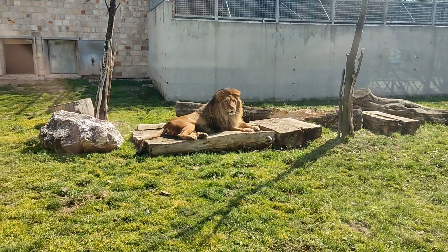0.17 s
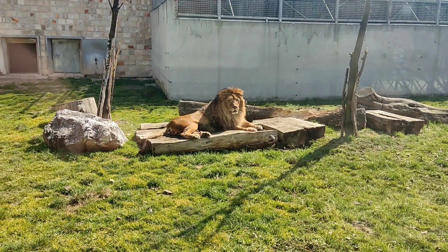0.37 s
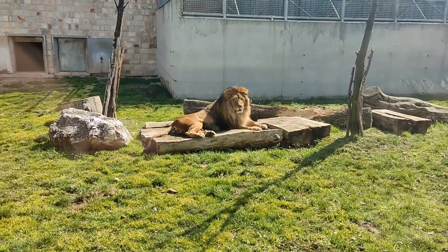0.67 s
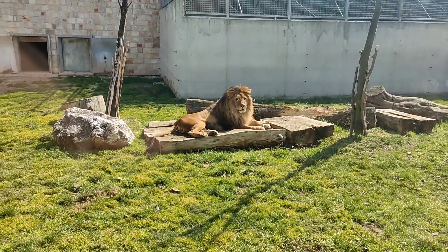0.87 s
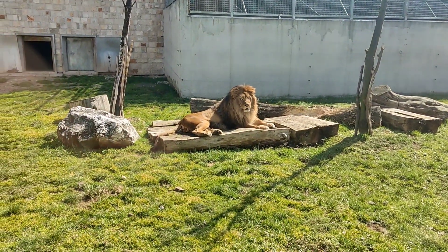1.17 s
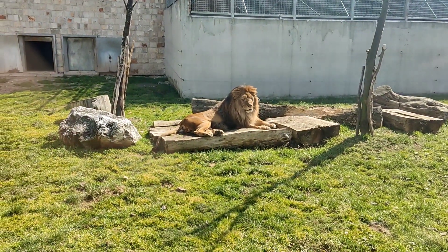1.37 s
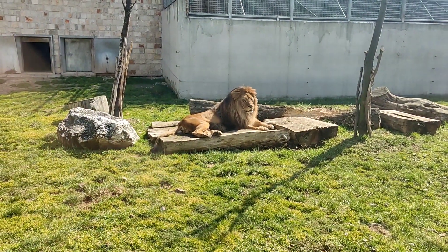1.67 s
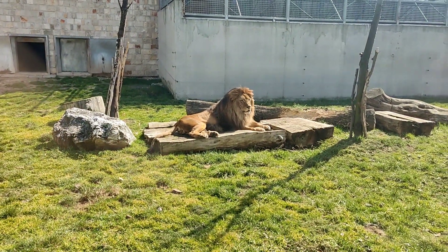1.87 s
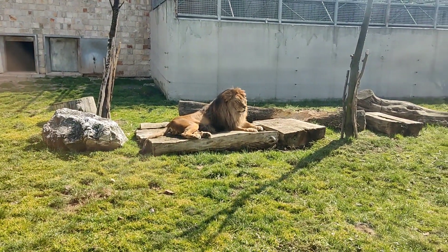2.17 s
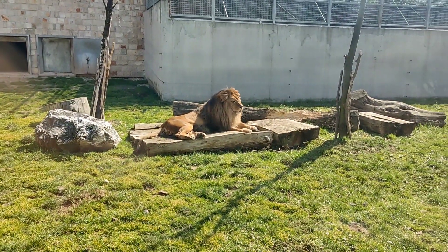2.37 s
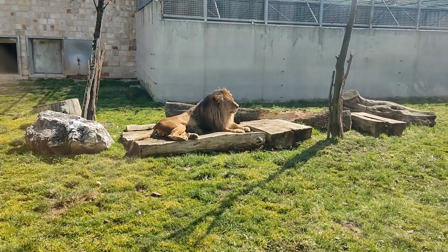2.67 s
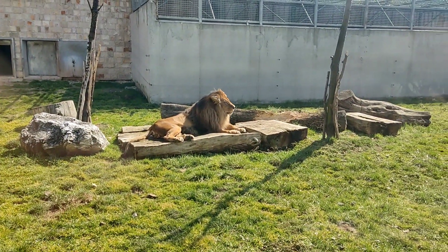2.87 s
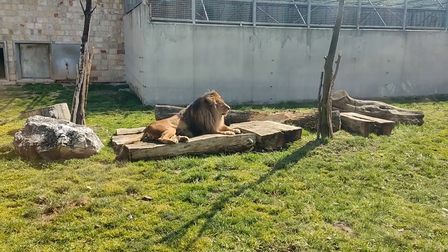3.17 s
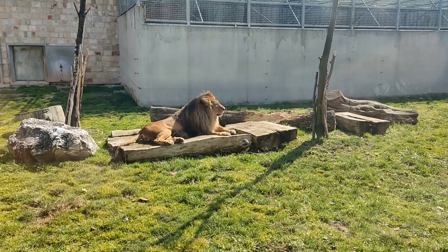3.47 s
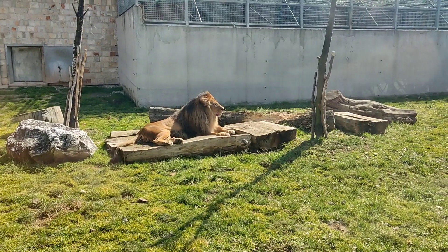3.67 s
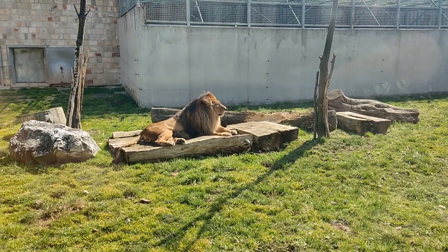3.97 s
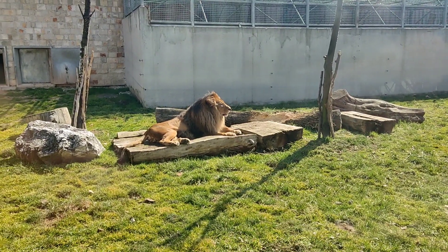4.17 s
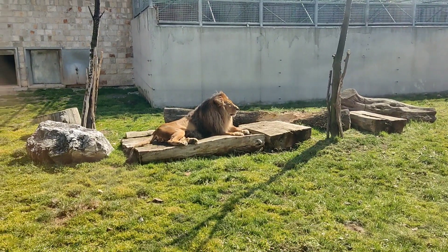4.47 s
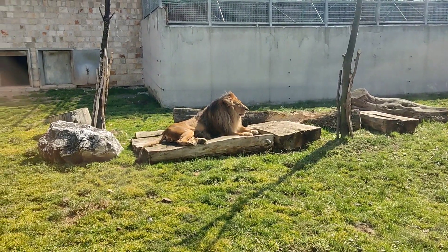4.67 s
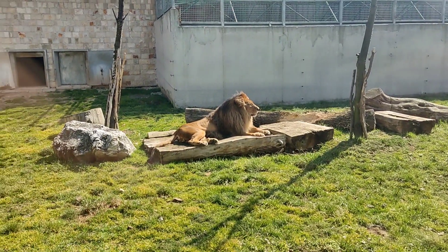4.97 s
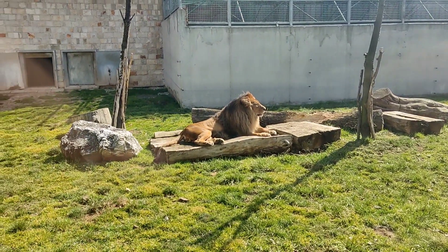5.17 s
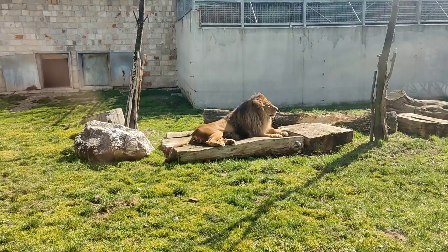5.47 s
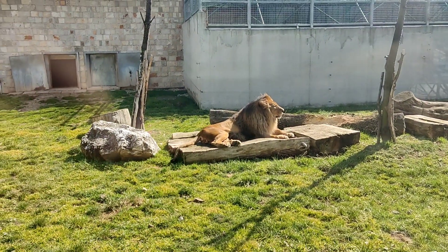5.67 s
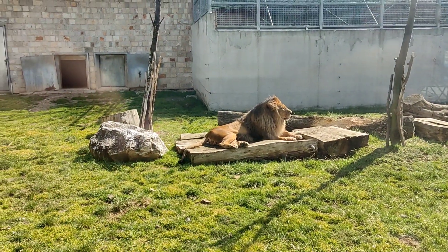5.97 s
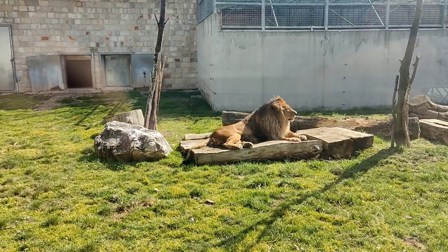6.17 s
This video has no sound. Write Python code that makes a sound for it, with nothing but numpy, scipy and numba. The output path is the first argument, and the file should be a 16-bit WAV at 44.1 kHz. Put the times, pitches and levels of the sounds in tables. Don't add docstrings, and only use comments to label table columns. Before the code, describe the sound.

A lion close on the left saws out a steady run of rasping in-breaths and rough, throaty grunts over faint outdoor wind and hiss.

```python
import sys
import numpy as np
from scipy import signal
from scipy.fft import rfft, irfft
from scipy.io import wavfile
from scipy.ndimage import uniform_filter1d, minimum_filter1d
from numba import njit

SR = 44100
rng = np.random.default_rng(int(sys.argv[2]) if len(sys.argv) > 2 else 0)


def decibels_to_gain(level_db):
    exponent = np.asarray(level_db, float) / 20
    return 10 ** exponent


def transcribe(signal):
    frames = np.atleast_2d(signal).T
    limited = np.clip(frames, -1, 1)
    pcm = np.round(limited * 32767).astype(np.int16)
    wavfile.write(sys.argv[1], SR, pcm)


N = 279153

# pitch_hz, level_db (per Hz)
WIND_COLOUR = [(15, -19), (25, 9.5), (129, 0), (392, -2.5), (1050, -42), (1440, -29), (1870, -23),
               (2710, -36), (4140, -16), (6160, -44), (6850, -20), (8030, -28), (14000, -51)]
# pitch_hz, left_minus_right_db
SHADE = [(60, -1), (160, 10), (400, 13), (800, 22), (1400, 25.5), (2300, 21.5), (2750, 10), (3050, 16),
         (3400, 33), (4200, 30), (4700, 32), (5600, 33), (8000, 24), (14000, 7)]
# pitch_hz, lead_radians
LEAD = [(0, 0), (780, 2.6), (2410, 5.3), (3100, 8.8), (4740, 11.0), (5080, 11.8), (5680, 17.9),
        (6890, 25.5), (7320, 25.3), (7920, 29.1), (10300, 22.4), (11500, 26.3), (13400, 41.1),
        (13900, 41.0)]
# pitch_hz, level_db (against the left)
SCATTER = [(100, -20), (1000, -26), (2300, -22), (2800, -12), (3400, -21), (4300, -21), (5000, -7),
           (6000, -5), (8400, -11), (14000, -3)]
# start_s, first_hz, last_hz, length_s, level_db
CHIRPS = [
    (0.062, 5600, 4000, 0.046, -41),
    (5.21, 620, 545, 0.075, -41.5),
    (5.215, 1000, 710, 0.088, -38),
    (.5, 1700, 3400, 0.023, -38),
]

# pitch_hz, width_hz, level_db
CHEST = [(309, 210, -10.5), (401, 55, 4), (460, 44, -6.5)]
THROAT = [(654, 105, -7.5), (700, 85, -4), (754.3, 72.4, -2.5), (941.3, 61.6, 0.5), (1002, 82, -5),
          (1140, 52, 1.5), (1210, 151, -4), (1360, 64, -2.5)]
MOUTH = [(1510, 352, -6.5), (1830, 126, 1.5), (2230, 164, -1), (2630, 370, -10), (2770, 385, -15.5),
         (3227, 276, -9), (3795, 520, -16), (4258, 312, -9.5), (4842, 140, -15), (5000, 110, -30.5),
         (5710, 140, -22)]
TEETH = [(8040, 4500, -1.1), (10470, 1700, -0.9)]
OPEN_AIR = [(3510, 670, 0)]

# start_s, end_s, first_db, last_db, mouth_opening_db
PULLS = [
    (0.447, 0.507, -10.5, -18, -2.5),
    (1.166, 1.303, -19, -16, -2.5),
    (1.986, 2.054, -17.5, -23, -7),
    (2.77, 2.837, -19.5, -17, -2.5),
    (3.639, 3.763, -21.5, -26, -0.5),
    (4.751, 4.816, -18, -17, -4),
    (5.572, 5.612, -21.5, -6.5, -9),
]
# start_s, end_s, first_db, last_db, catch_depth_db
GRUNTS = [
    (0.593, 0.651, -15.5, -17.5, -2),
    (1.363, 1.438, -19, -19, -9),
    (2.14, 2.187, -19, -17.5, 10),
    (2.956, 3.011, -18, -15, -39),
    (3.918, 4.101, -16.5, -30.5, 7.5),
    (4.899, 4.914, -19.5, -17.5, -7),
    (5.772, 5.865, -22, -20, 8.5),
]
# start_s, end_s, first_db, last_db, mouth_opening_db
PUSHES = [
    (0, 0.047, -19.5, -23, 1),
    (0.744, 0.887, -20, -29, 0.5),
    (1.558, 1.64, -17.5, -27, 2),
    (2.303, 2.376, -21.5, -28, 2.5),
    (3.112, 3.272, -24.5, -31.5, 3.5),
    (4.124, 4.213, -15, -22.5, -3.5),
    (4.257, 4.422, -19.5, -29, 5),
    (5.016, 5.075, -25.5, -28.5, 3),
    (5.971, 6.088, -20.5, -28, 1.5),
]
# chest_db_per_s, mouth_db_per_s, teeth_db_per_s
PULL_MOTION = (210, 430, -15, -6, -37, 33, 4, 23)
GRUNT_MOTION = (803, 213, -3, -6.5, -24, -107, 4, -61)
PUSH_MOTION = (169, 316, -10, -2, -29, -3, -3.5, -27)
# start_s, end_s, first_db, last_db
HISSES = [
    (0, .36, -55, -49.5),
    (2.23, 2.55, -47, -60),
    (3.555, 3.85, -60, -54),
]
# end_s, depth_db
CHOKES = [
    (1.206, -1),
    (1.377, -9),
    (2.001, -15),
    (2.844, -27),
    (3.742, -10),
    (4.189, 3),
    (5.619, -26),
    (1.565, -13),
]
# end_s, top_s, top_hz, level_db (at the top of the pitch)
HUMS = [
    (.95, 0.71, 163.7, -54.5),
    (1.72, 1.5, 155.4, -52.5),
    (2.48, 2.43, 167.2, -53),
    (3.3, 3.08, 176.6, -46),
    (4.312, 4.096, 203.3, -44.5),
    (5.1, 4.9, 155.2, -51.5),
    (6.17, 5.66, 166, -46),
]
# time_s, peak_db, ring_hz
PULL_FLAPS = [(.384, -11, 1140), (.424, -14, 1220), (.468, -10, 1180), (.503, -4.5, 1830), (1.159, -9, 930),
              (1.178, 0.5, 700), (1.209, -3, 1184), (1.271, -6, 930), (1.331, -10.5, 1650),
              (1.962, -9.5, 960), (2.005, -9.5, 940), (2.809, -7, 1280), (2.843, -7.5, 915),
              (3.627, -11.5, 1860), (3.706, -8, 750), (3.744, -0.5, 923), (4.745, -3, 965),
              (4.796, -2.5, 914), (5.569, -7.5, 1360), (5.619, -4.5, 908)]
# time_s, peak_db, ring_hz
GRUNT_FLAPS = [(0.592, -2, 1198), (1.366, -8.5, 1187), (1.4, -2, 1140), (2.14, -8, 580), (2.165, -16, 935),
               (2.957, -10, 1140), (3.923, -10, 1210), (3.968, -6, 1330), (3.999, -6, 1380),
               (4.895, -9.5, 950), (5.781, -7, 915), (5.798, -6, 993), (5.845, -7.5, 1360)]
# time_s, peak_db, ring_hz
PUSH_FLAPS = [(0.019, -11, 1140), (.038, -6.5, 2170), (.061, -7.5, 780), (0.772, -7.5, 2205),
              (0.874, -10, 1110), (1.528, -6.5, 785), (1.567, -9, 763), (1.67, -13, 1080), (2.29, -10, 905),
              (2.312, 3.5, 1226), (2.364, -6.5, 1200), (3.129, -7.5, 737), (3.156, -8.5, 1210),
              (3.216, -16, 930), (4.096, -10, 1260), (4.196, -9, 920), (4.302, -4, 2230), (4.356, -10, 854),
              (5.032, -7.5, 1905), (5.956, -5, 870), (5.976, -7, 2230), (5.995, -6, 903),
              (6.037, -7.5, 910), (6.063, -13, 1360), (6.088, -9.5, 1182)]
# time_s, peak_db, ring_hz
SMACKS = [
    (.305, -15.5, 2265),
    (.351, -14, 1580),
    (3.46, -14, 2230),
    (3.511, -14, 2117),
]
# start_s, peak_db
SPITS = [
    (0.3514, -67),
    (2.844, -37),
    (3.7449, -42),
    (4.3036, -35),
    (5.618, -32),
]

ALL_FLAPS = PULL_FLAPS + GRUNT_FLAPS + PUSH_FLAPS + SMACKS
# throat_db, mouth_db
GUSH = (
    [(-9, -17.5)] * len(PULL_FLAPS)
    + [(-11.5, -23.5)] * len(GRUNT_FLAPS)
    + [(-8, -16.5)] * len(PUSH_FLAPS)
    + [(-21, -6.5)] * len(SMACKS)
)


def level(x, db):
    return x * decibels_to_gain(db) / np.sqrt(np.mean(x ** 2))


def on_log(table, hz):
    f, v = np.transpose(table)
    return np.interp(np.log(hz + 1), np.log(f + 1), v)


def walk(rate):
    k = int(SR / rate)
    held = np.repeat(rng.standard_normal(N // k + 1), k)
    return 1.46 * uniform_filter1d(uniform_filter1d(held, k), k)[:N]


def sieve(x, order, hz, kind):
    return signal.sosfilt(signal.butter(order, hz, kind, fs=SR, output="sos"), x)


@njit
def resonator(x, hz, width):
    y, b, l = np.empty(len(x)), 0., 0.
    for i in range(len(x)):
        g, k = np.tan(np.pi * hz[i] / SR), width / hz[i]
        v = (b + g * (x[i] - l)) / (1 + g * (g + k))
        b, l, y[i] = 2 * v - b, l + 2 * g * v, k * v
    return y


def yard(mouth_db):
    noise = rng.standard_normal((5, N))
    gusts = decibels_to_gain(1.8 * np.array([walk(4.3), walk(4.82)]))
    colour = decibels_to_gain(on_log(WIND_COLOUR, np.fft.rfftfreq(N, 1 / SR)))
    wind = irfft(rfft(noise[:2]) * colour, N) * gusts
    shared = np.array([noise[4], np.roll(noise[4], shift=20)])
    hiss = noise[2:4] + 1.3 * shared
    centre_hz = np.full(N, 6884.0)
    whistle = []
    for side in hiss:
        for width_hz in (650.0, 650.0, 1300.0):
            side = resonator(side, centre_hz, width_hz)
        whistle.append(side)
    whistle = level(np.array(whistle), -56.5) * decibels_to_gain(1.8 * walk(14))
    whistle = whistle * (1 + decibels_to_gain(mouth_db + 27))
    return level(wind, -55.5) * decibels_to_gain([[1.2], [-1.2]]) + whistle


@njit
def walls(x, lags, gain, damp):
    line, soft, out = np.zeros((8, 4096)), np.zeros(8), np.zeros((2, len(x)))
    for i in range(len(x)):
        total = 0.
        for k in range(8):
            soft[k] += (1 - damp) * (gain[k] * line[k, (i - lags[k]) & 4095] - soft[k])
            total += soft[k]
            out[k % 2, i] += soft[k]
        for k in range(8):
            line[k, i & 4095] = x[i] + soft[k] - total / 4
    return out


def chirps():
    out = np.zeros(N)
    for start, first_hz, last_hz, length, db in CHIRPS:
        n, i = int(length * SR), int(start * SR)
        turns = np.cumsum(np.linspace(first_hz, last_hz, n)) / SR
        out[i:i + n] += decibels_to_gain(db) * np.hanning(n) * np.sin(2 * np.pi * turns)
    return out


def spits(width_s=0.016):
    shape, n = np.zeros(N + 2000), int(width_s * SR)
    for start, db in SPITS:
        i = int(start * SR)
        shape[i:i + n] += decibels_to_gain(db - 3.5) * np.hanning(n)
    return sieve(shape[:N] * rng.standard_normal(N), 3, [6000, 11500], "band")


def choke(length_s=0.0084):
    db, n = np.zeros(N), int(length_s * SR)
    for end, depth_db in CHOKES:
        i = int(end * SR)
        db[i - n:i] += depth_db * np.hanning(n) ** .5
    return decibels_to_gain(db)


def stroke(start, end, first_db, last_db, attack, release):
    t = np.arange(N) / SR
    hold = np.interp(t, [start, end], [first_db, last_db])
    return hold - attack * np.maximum(start - t, 0) - release * np.maximum(t - end, 0)


def quiet_air(db, mouth_db):
    colour = np.array([0, -13, -7 + mouth_db, -29])
    return decibels_to_gain(db + colour[:, None]) ** 2


def breath():
    t = np.arange(N) / SR
    rest_db, sigh_db, sigh_db_per_s = -44.0, -4, 25
    lead_db, lead_db_per_s, lead_mouth_db = -25.5, 61, 11
    catch_s, catch_early_s, hiss_db_per_s = 0.081, 0.0055, 105
    power = quiet_air(np.full(N, rest_db), 0)
    for _, end, _, db, mouth_db in PUSHES:
        sigh = stroke(end, end + .01, db + sigh_db, db + sigh_db, PUSH_MOTION[0], sigh_db_per_s)
        power = power + quiet_air(sigh, mouth_db)
    for start, end, db, *_ in PULLS:
        draw = stroke(start, end, db + lead_db, db + lead_db, lead_db_per_s, PULL_MOTION[1])
        power = power + quiet_air(draw, lead_mouth_db)
    for start, *_, depth_db in GRUNTS:
        middle = start - catch_early_s - catch_s / 2
        catch = np.exp(-((t - middle) / (catch_s / 2)) ** 4)
        power = power * decibels_to_gain(depth_db * catch) ** 2
    kinds = ((PULLS, PULL_MOTION, 1), (GRUNTS, GRUNT_MOTION, 0), (PUSHES, PUSH_MOTION, 1))
    for rows, (attack, release, *colour), opens in kinds:
        colour_db = np.array(colour[:3])[:, None]
        drift_db_per_s = np.array(colour[3:])[:, None]
        for start, end, first_db, last_db, extra_db in rows:
            near = slice(max(int((start - .3) * SR), 0), int((end + .3) * SR))
            tilt_db = colour_db + drift_db_per_s * np.clip(t[near] - start, 0, end - start)
            tilt_db[1] += opens * extra_db
            flow = decibels_to_gain(stroke(start, end, first_db, last_db, attack, release)[near])
            power[:, near] += (flow * np.vstack([np.ones_like(flow), decibels_to_gain(tilt_db)])) ** 2
    for row in HISSES:
        power[3] += decibels_to_gain(stroke(*row, hiss_db_per_s, hiss_db_per_s)) ** 2
    db = 10 * np.log10(power)
    return db[0], *(db[1:] - db[0])


def folds(effort_db, hz=288.3, jitter=.4, voiced_db=-26.0, flutter_db=4.0):
    uneven_time, uneven_size = rng.standard_normal((2, 3000))
    at = np.cumsum(SR / hz * np.exp(jitter * uneven_time)).astype(int)
    pulses = np.zeros(N)
    pulses[at[at < N]] = decibels_to_gain(3.8 * uneven_size)[at < N]
    air = rng.standard_normal(N)
    puff_s = .0015
    puffs = air * signal.lfilter([1], [1, -np.exp(-1 / (puff_s * SR))], pulses)
    voiced = 1 / (1 + decibels_to_gain(0.44 * (voiced_db - effort_db)))
    rasp = level(pulses, -4) + level(puffs, -3)
    soft_air = (1 - .75 * voiced) * air
    return (voiced * rasp + soft_air) * decibels_to_gain(flutter_db * voiced * walk(38))


def flaps(size_db, tail_s=0.0054, rise_s=0.0011):
    slap = np.zeros(N)
    slap[(np.array(ALL_FLAPS)[:, 0] * SR).astype(int)] = decibels_to_gain(size_db)
    t = np.arange(1500) / SR
    swell = 1.24 * (np.exp(-t / tail_s) - np.exp(-t / rise_s))
    gush = signal.fftconvolve(slap, swell)[:N]
    return 3.8 * slap + gush * rng.standard_normal(N)


def rings(t60=0.054, ring_db=-7):
    n = 4000
    out, t = np.zeros(N + n), np.arange(n) / SR
    for start, db, hz in ALL_FLAPS:
        i = int(start * SR)
        out[i:i + n] += decibels_to_gain(db + ring_db) * np.sin(2 * np.pi * hz * t) * decibels_to_gain(-60 * t / t60)
    return out[:N]


def tract(source, modes, drift=0.023, patchy_db=2.5):
    power = sum(decibels_to_gain(db) ** 2 * np.pi * w / SR for f, w, db in modes)
    out = 0
    for k, (f, w, db) in enumerate(modes):
        hz = f * (1 + drift * walk(9))
        patchy = source * decibels_to_gain(patchy_db * walk(16))
        out = out + (-1) ** k * decibels_to_gain(db) * resonator(patchy, hz, 1. * w)
    return out / np.sqrt(power)


def hum(effort_db):
    rest_hz, sag_s, start_share = 149.7, .05, .6
    start_db, fade_db_per_s, sag_db = -1.5, 31, -4.5
    line, closures, t = 0, 0, np.arange(N) / SR
    for (start, *_), (end, top, top_hz, top_db) in zip(GRUNTS, HUMS):
        rise = np.interp(t, [start, top], [start_share, 1]) * np.exp(-np.maximum(t - top, 0) / sag_s)
        hz = rest_hz + (top_hz - rest_hz) * rise
        times = [start - .025, start - .01, top, end, end + .025]
        last_db = top_db - fade_db_per_s * (end - top)
        db = np.interp(t, times, [-110, top_db + start_db, top_db, last_db, -110])
        turns = np.cumsum(hz * (1 + 0.016 * walk(60))) / SR
        line = line + decibels_to_gain(db + 5 + sag_db * (1 - rise)) * np.sin(2 * np.pi * turns)
        train = np.diff(np.floor(turns), prepend=0) * np.sqrt(SR / hz)
        closures = closures + train * decibels_to_gain(effort_db - 3) * (db > -75)
    return line * decibels_to_gain(4 * walk(28) - 3), closures * decibels_to_gain(2.5 * walk(60))


def cat():
    throat_db, chest_db, mouth_db, teeth_db = breath()
    line, closures = hum(throat_db)
    pinch = choke()
    rasp = level(folds(throat_db), -1.43) * decibels_to_gain(throat_db) * pinch
    peak_db = np.array(ALL_FLAPS)[:, 1]
    throat_gush_db, mouth_gush_db = np.transpose(GUSH)
    low = flaps(peak_db + throat_gush_db + 1.0)
    high = flaps(peak_db + mouth_gush_db + 4.5)

    chest = tract((rasp + decibels_to_gain(-4.5) * closures) * decibels_to_gain(chest_db) + decibels_to_gain(-15) * low, CHEST)
    chest = sieve(chest, 2, [290, 480], "band")
    flow = tract(rasp + closures, THROAT)
    flow = flow + tract((rasp + decibels_to_gain(-10.0) * closures) * decibels_to_gain(mouth_db), MOUTH)
    still_air = decibels_to_gain(-48.5) * rng.standard_normal(N)
    flow = flow + tract(rasp * decibels_to_gain(mouth_db - 19) + still_air, OPEN_AIR, patchy_db=0.84)
    voice = chest + flow * pinch ** .5 + tract(low, THROAT) + tract(high, MOUTH) + rings()
    voice = sieve(voice, 4, 260, "high")
    voice = sieve(voice, 6, 6000, "low")
    teeth = tract(rasp * decibels_to_gain(teeth_db - 4.0) + decibels_to_gain(-35) * high, TEETH)
    teeth = sieve(teeth, 3, [8200, 13000], "band")
    return voice + teeth + line + spits(), mouth_db + throat_db


def scene():
    voice, mouth_db = cat()
    voice = (voice + chirps()) * decibels_to_gain(7.0)
    hz = np.fft.rfftfreq(N, 1 / SR)
    round_body = decibels_to_gain(-on_log(SHADE, hz)) * np.exp(-1j * np.interp(hz, *np.transpose(LEAD)))
    scattered = rfft(np.roll(voice, shift=40) * walk(120)) * decibels_to_gain(on_log(SCATTER, hz))
    right = irfft(rfft(voice) * round_body + scattered, N)
    lags = rng.integers(600, 2600, 8)
    echo_t60_s, echo_damp, echo_db = 0.45, 0.17, -37.5
    echo = walls(voice, lags, decibels_to_gain(-60 * lags / SR / echo_t60_s), echo_damp)
    return np.array([voice, right]) + decibels_to_gain(echo_db) * echo + yard(mouth_db)


def roll_off(x):
    return signal.sosfilt(signal.butter(12, 14330, fs=SR, output="sos"), x)


def record(dry):
    air = sieve(rng.standard_normal(dry.shape), 8, 8600, "high")
    top_cut = signal.ellip(8, .2, 70, 14300, fs=SR, output="sos")
    dry = signal.sosfilt(top_cut, dry + level(air, -69))
    ceiling = .9
    room = np.minimum(1, ceiling / (np.abs(dry).max(axis=0) + 1e-9))
    gain = uniform_filter1d(minimum_filter1d(room, size=401), size=201)
    return roll_off(dry * gain)


dry = scene()
out = record(dry)
transcribe(out)
```